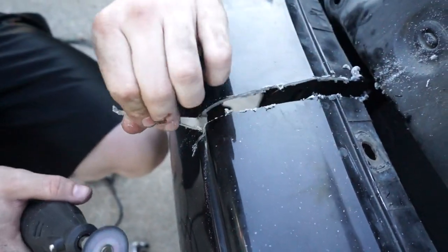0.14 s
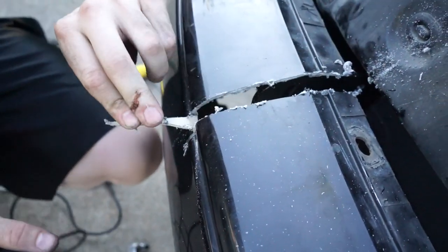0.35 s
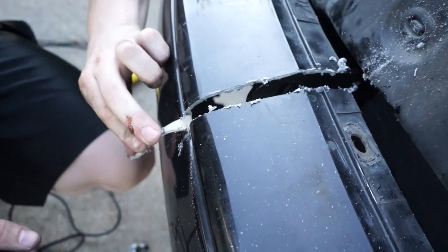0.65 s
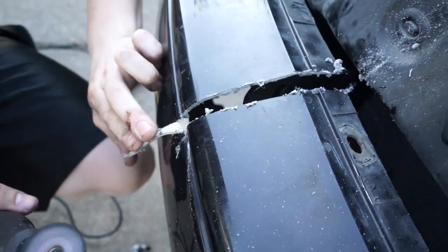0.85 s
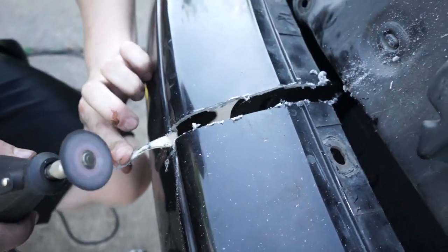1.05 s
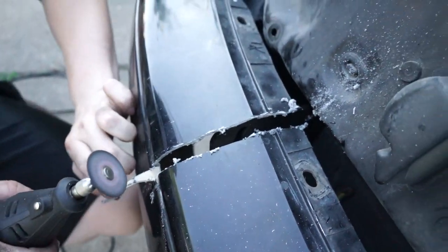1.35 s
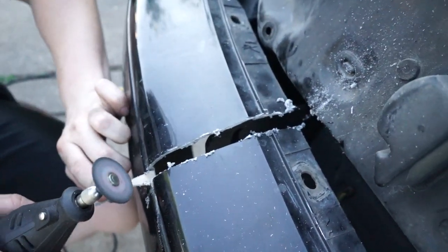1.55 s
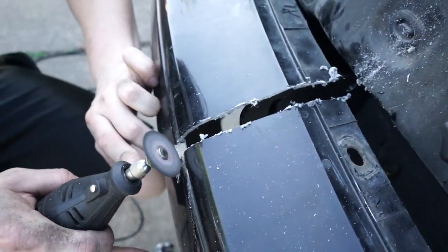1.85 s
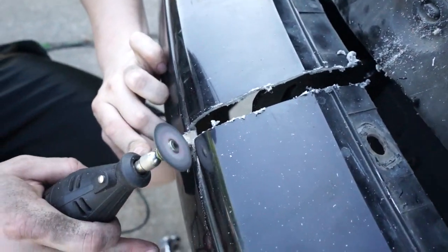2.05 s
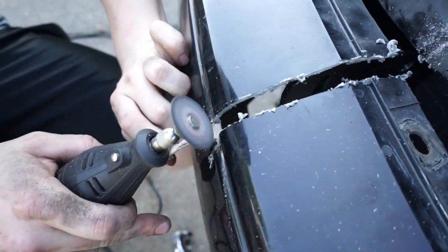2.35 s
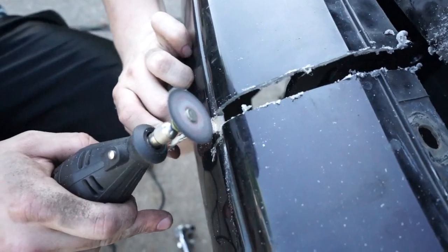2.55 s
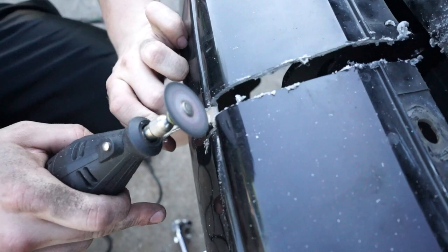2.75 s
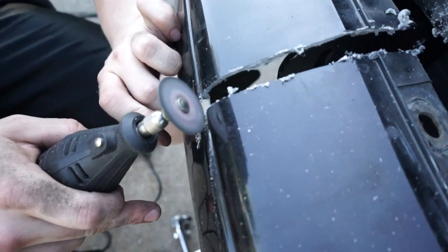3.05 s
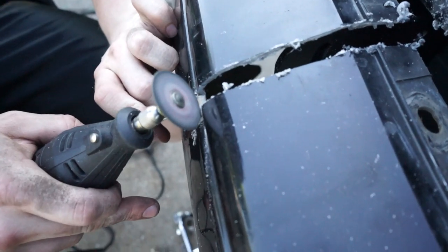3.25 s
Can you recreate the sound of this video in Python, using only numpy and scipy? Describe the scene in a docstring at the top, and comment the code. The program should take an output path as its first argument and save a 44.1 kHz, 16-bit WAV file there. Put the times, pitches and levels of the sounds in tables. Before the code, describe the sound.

A handheld rotary tool whines at a steady high pitch with airy hiss, close up.

```python
"""Rotary tool beside a plastic bumper

A hand-held rotary tool runs at full speed close to a stereo microphone, beside a car's plastic bumper.
It is first held aside, then swung to the panel, where the disc touches and the motor slows a little.
The shaft sings a stack of sine tones, and the commutator whines at the sixteenth multiple.
Fan and brushes hiss as shaped noise; late on, the hand knocks softly on the panel in short low pulses."""
import sys
import numpy as np
from scipy import signal
from scipy.fft import rfft, irfft, next_fast_len
from scipy.io import wavfile
from scipy.ndimage import uniform_filter1d, map_coordinates

SR = 44100
rng = np.random.default_rng(int(sys.argv[2]) if len(sys.argv) > 2 else 0)


def output_pcm(signal):
    """Save a mono or channel-first signal as 16-bit PCM at the path in sys.argv[1].

    Samples are clipped to [-1, 1] before scaling.
    """
    pcm = np.clip(np.atleast_2d(signal).T, -1, 1) * 32767
    wavfile.write(sys.argv[1], SR, np.round(pcm).astype(np.int16))


N = 149940  # samples
TIME = np.arange(N) / SR  # seconds
PORT = np.array([[.5], [-.5]])  # shares a left-right difference between the two microphone ports


def amp(db):
    """Turn decibels into a plain multiplier."""
    return np.exp(np.asarray(db) * np.log(10) / 20)


def curves(rows):
    """One value per sample for each column after the time."""
    seconds, *columns = np.transpose(rows)
    return [np.interp(TIME, seconds, column) for column in columns]


def wobble(rate):
    """Two smooth random curves, one a port, with `rate` random knots a second."""
    knots = rng.standard_normal((2, 128))
    step = np.arange(0, N + 64, 64)  # the smooth curve is worked out every 64 samples
    position = step * rate / SR
    smooth = [map_coordinates(k, [position], mode="wrap") for k in knots]
    return np.array([np.interp(np.arange(N), step, curve) for curve in smooth])


def filtered(x, response):
    """Shape the spectrum of x with a complex response that depends on frequency."""
    size = next_fast_len(N + SR // 2)
    spectrum = rfft(x, size) * response(np.fft.rfftfreq(size, 1 / SR))
    return irfft(spectrum, size)[..., :N]


# How the tool swings from the side to the panel.
# Each row: time in seconds, position (0 held aside, 1 at the panel), change of the hiss level in dB.
SWING_PATH = [(0, 0.25, -2), (.85, 0.092, -0.5), (1.2, 0.41, -3.5), (1.6, 0.68, -3.5), (2.3, 0.8, 0.5),
              (3.4, 0.7, -0.5)]


def posed(aside, panel):
    """A value that moves with the tool's swing, from held aside to at the panel."""
    seconds, position, _ = np.transpose(SWING_PATH)
    return np.interp(TIME, seconds, aside + (panel - aside) * np.clip(position, 0, 1))


# How fast the shaft spins, before its small jitter.
# Each row: time in seconds, shaft turns per second in Hz.
SHAFT_SPEED = [(0, 502.05), (1.1, 501.9), (1.99, 501.4), (2.13, 499.45), (2.22, 499.45), (2.45, 500.1),
               (3.05, 500.7), (3.4, 499.9)]
JITTER_HZ, JITTER_RATE = 0.16, 18  # unsteady shaft speed: size in Hz, knots per second


def shaft():
    """Shaft angle in radians: the speed and its jitter, added up over time."""
    speed = curves(SHAFT_SPEED)[0] + JITTER_HZ * wobble(JITTER_RATE)[0]
    return 2 * np.pi * np.cumsum(speed) / SR


LEAD_ASIDE_S, LEAD_PANEL_S = 9e-5, 5e-5  # the left port hears the tool this many seconds first


def shaft_lead():
    """The left port's head start, in radians of shaft turn."""
    return posed(LEAD_ASIDE_S, LEAD_PANEL_S) * 2 * np.pi * curves(SHAFT_SPEED)[0]


def tone(phase, level_db, pan_db, lead):
    """A stereo sine of given rms level, left-right difference and left lead in radians."""
    start = rng.uniform(0, 2 * np.pi)
    return np.sqrt(2) * amp(level_db + PORT * pan_db) * np.sin(phase + PORT * lead + start)


# The commutator whine, fading at each port as the tool moves among reflections.
# Each row: time in seconds, left level in dB, right level in dB, left lead in rad; levels before trembling.
WHINE_LEVELS = [(0, -26, -29, 2.6), (.12, -19.5, -17.5, 2.13), (.2, -21, -28, 1.5),
                (.26, -24.5, -26.5, 5.3), (.44, -22.5, -22, 4), (.56, -17.5, -33, 7.7),
                (.74, -19.5, -22.5, 5.8), (.84, -24, -22, 10.7), (.94, -17, -23.5, 12.8),
                (1.01, -22, -25, 13.3), (1.07, -20.5, -15, 19.5), (1.13, -14, -17.5, 17.3),
                (1.25, -18, -19, 16.4), (1.38, -22, -20.5, 17.16), (1.51, -15, -12, 18.2),
                (1.78, -20, -12.5, 17.02), (1.97, -12.5, -21, 15.1), (2.17, -16, -19, 15.75),
                (2.27, -15, -15.5, 15.7), (2.39, -15, -24, 14.2), (2.47, -17.5, -18.5, 15.9),
                (2.72, -15, -19, 15), (2.99, -17.5, -15, 14.6), (3.21, -21.5, -15, 15),
                (3.4, -16, -17.5, 16)]
BARS = 16  # commutator bars passing per shaft turn
TREMBLE_DB, TREMBLE_RATE = .5, 35  # fast level tremble at each port: size in dB, knots per second


def whine(angle):
    """The commutator bars pass sixteen times a turn, loud and shifting between the ports."""
    left_db, right_db, lead = curves(WHINE_LEVELS)
    level_db = (left_db + right_db) / 2 + TREMBLE_DB * wobble(TREMBLE_RATE)
    return tone(BARS * angle, level_db, left_db - right_db, lead)


# The first five shaft tones as the tool turns, before flutter and trembling.
# Each row: time in seconds, then the levels of the 1st, 2nd, 3rd, 4th and 5th tone in dB.
LOW_LEVELS = [(0, -37, -31.7, -31, -42.5, -32), (0.33, -37, -33.5, -32, -40.5, -34.5),
              (0.62, -31, -34, -35, -41, -40), (0.85, -33, -38.3, -27.5, -44.5, -35),
              (1.04, -33.5, -37.5, -36, -27, -36), (1.22, -31.5, -38.5, -41.5, -37, -42.5),
              (1.45, -27.5, -43.5, -45, -37, -38), (1.8, -29.5, -42, -44.5, -40, -45.5),
              (2.15, -27, -40, -38, -31, -60), (2.7, -27.5, -36, -37.5, -30.5, -40.5),
              (3.4, -27.5, -36.5, -35.5, -27.5, -40.5)]
# The same five tones between the ports, one row a tone.
# Each row: left minus right in dB aside, the same at the panel, left lead in rad aside, the same at the panel.
LOW_PORTS = [(-1.5, 4.6, 0.44, 0.32), (5, 11.5, 0.35, -2), (5, .1, 0.02, -0.96), (10, 1.2, -0.88, 1.1),
             (10.5, 2.3, 0.44, -1.5)]
FLUTTER_DB, FLUTTER_RATE = .3, 8.66  # slow flutter: size in dB times the tone number, knots per second


def low_tones(angle):
    """Unbalance of disc and rotor sings at the shaft multiples; higher tones flutter more in the hand."""
    total = 0
    for k, (level_db, ports) in enumerate(zip(curves(LOW_LEVELS), LOW_PORTS), 1):
        pan_aside, pan_panel, lead_aside, lead_panel = ports
        flutter_db = FLUTTER_DB * k * wobble(FLUTTER_RATE)[0]
        tremble_db = TREMBLE_DB * wobble(TREMBLE_RATE)
        pan_db, lead = posed(pan_aside, pan_panel), posed(lead_aside, lead_panel)
        total = total + tone(k * angle, level_db + flutter_db + tremble_db, pan_db, lead)
    return total


# Shaft tones that swell on their own as the tool turns.
# Each row: multiple of the shaft speed, left minus right in dB.
MIDDLE_PORTS = [(6, -4), (7, 0), (11, 5.5), (15, 8.5), (17, -11.5)]
# Their levels before trembling.
# Each row: time in seconds, then the level in dB of each tone above, in the same order.
MIDDLE_LEVELS = [(0, -41, -36.5, -39, -38, -30), (.5, -52, -38, -40, -31, -39.5),
                 (.9, -46, -36.5, -34, -33.5, -34.5), (1.6, -55, -42, -54.5, -39.5, -35.5),
                 (1.9, -36.5, -45, -40.5, -44, -37.5), (2.4, -41.5, -41.5, -36, -27.5, -40.5),
                 (2.85, -39.5, -42, -34.5, -38, -37), (3.4, -41, -35, -44, -36, -37)]


def middle_tones(angle):
    """Shaft tones of the middle range, trembling at each port twice as deeply as the low ones."""
    lead = shaft_lead()
    total = 0
    for (k, pan_db), level_db in zip(MIDDLE_PORTS, curves(MIDDLE_LEVELS)):
        tremble_db = 2 * TREMBLE_DB * wobble(TREMBLE_RATE)
        total = total + tone(k * angle, level_db + tremble_db, pan_db, k * lead)
    return total


# Weaker shaft tones, before fading.
# Each row: multiple of the shaft speed, level in dB aside, level in dB at the panel, left minus right in dB.
UPPER_TONES = [(8, -53.5, -47, 4), (14, -38.5, -41, 1.5), (18, -32.5, -40.5, -2.5), (23, -52, -49, 0),
               (31, -41, -54, 11)]
# Side tones from the mains ripple in the motor, before fading.
# Each row: shaft multiple, ripple multiple, level in dB aside, level in dB at the panel.
RIPPLE_TONES = [(2, 1, -52, -78), (2, 2, -49, -75), (4, -1, -43, -57), (4, 1, -40.5, -54),
                (5, -1, -33, -81), (5, 1, -39, -52), (6, -1, -56, -47)]
RIPPLE_HZ = 120
BEARING, BEARING_ASIDE_DB, BEARING_PANEL_DB = 4.945, -34.5, -55  # balls passing per shaft turn; levels
FADE_DB, FADE_RATE, DRIFT_RAD = 2.2, 4.5, .45  # slow fading at each port, knots per second, phase drift
# The remaining shaft multiples, falling in level by one even step each: first level, and the step.
REST_ASIDE_DB, REST_PANEL_DB, REST_STEP_DB = -45.5, -50.5, -.55
TAKEN = [BARS] + [row[0] for row in UPPER_TONES] + [row[0] for row in MIDDLE_PORTS]
REST = [k for k in range(8, 31) if k not in TAKEN]


def weak_tones(angle):
    """Upper and remaining shaft tones, ripple side tones and the bearing, each fading on its own."""
    ripple = 2 * np.pi * RIPPLE_HZ * TIME
    lead = shaft_lead()
    # each: shaft multiple, ripple multiple, dB aside, dB at the panel, left minus right dB
    rows = [(k, 0, aside, panel, pan) for k, aside, panel, pan in UPPER_TONES]
    rows += [(k, m, aside, panel, 2.5) for k, m, aside, panel in RIPPLE_TONES]
    for j, k in enumerate(REST):
        step_db = REST_STEP_DB * j
        rows.append((k, 0, REST_ASIDE_DB + step_db, REST_PANEL_DB + step_db, 2))
    rows.append((BEARING, 0, BEARING_ASIDE_DB, BEARING_PANEL_DB, 4))
    total = 0
    for k, m, aside, panel, pan_db in rows:
        phase = k * angle + m * ripple + DRIFT_RAD * wobble(FADE_RATE)
        level_db = posed(aside, panel) + FADE_DB * wobble(FADE_RATE)
        total = total + tone(phase, level_db, pan_db, k * lead)
    return total


# Spectrum of the fan and brush hiss, before the level change of the swing.
# Each row: frequency in Hz, level in dB per Hz aside, level in dB per Hz at the panel.
HISS_SPECTRUM = [(40, -100, -100), (100, -86, -89), (285, -86, -90.5), (710, -79.5, -87),
                 (1160, -72, -80.5), (1833, -63, -68.5), (1947, -59.5, -60.5), (2530, -63.5, -72.5),
                 (3350, -65.5, -74.5), (4480, -65, -74), (7800, -68.5, -70.5), (8470, -64, -73.5),
                 (10400, -71.5, -104), (10600, -67.5, -70), (14400, -77.5, -86.5)]
ALIKE_BASS, ALIKE_TREBLE, ALIKE_TURN_HZ = .93, .5, 3000  # left-right likeness of the hiss
PATCHY_DB = 1.6  # uneven loudness over time and frequency
HISS_PAN_DB, GATE = 0.5, 0.3  # each port's shift, left up and right down; pulsing depth, added by choice


def rush(column, lead_s):
    """Patchy stereo noise with the hiss spectrum of one position."""
    grains = signal.stft(rng.standard_normal((2, N)), nperseg=512)[2]
    field = rng.standard_normal(grains.shape[1:])
    field = uniform_filter1d(uniform_filter1d(field, size=5, axis=0), size=8, axis=1)
    patches = amp(PATCHY_DB * field / field.std())
    shared, opposed = signal.istft(grains * patches, nperseg=512)[1][:, :N]
    table = np.transpose(HISS_SPECTRUM)

    def turn(hz):
        """Mixing angle that makes the two ports as alike as wanted."""
        alike = ALIKE_TREBLE + (ALIKE_BASS - ALIKE_TREBLE) / (1 + (hz / ALIKE_TURN_HZ) ** 2)
        return np.arccos(np.clip(alike, 0, 1)) / 2

    def colour(hz):
        """Hiss spectrum, with the left port ahead in time."""
        level_db = np.interp(np.log(hz + 1), np.log(table[0]), table[column])
        return np.sqrt(SR / 2) * amp(level_db) * np.exp(2j * np.pi * hz * lead_s * PORT)

    same = filtered(shared, lambda hz: colour(hz) * np.cos(turn(hz)))
    opposite = filtered(opposed, lambda hz: 2 * PORT * colour(hz) * np.sin(turn(hz)))
    return same + opposite


def hiss(angle):
    """Fan and brush noise with a slight pulsing at the shaft rate added by choice, duller at the panel."""
    swing = posed(0, np.pi / 2)
    aside = np.cos(swing) * rush(column=1, lead_s=LEAD_ASIDE_S)
    panel = np.sin(swing) * rush(column=2, lead_s=LEAD_PANEL_S)
    pulsing = 1 + GATE * np.sin(angle)
    level_db = curves(SWING_PATH)[1] + 2 * PORT * HISS_PAN_DB
    return (aside + panel) * pulsing * amp(level_db)


# Soft low knocks of the hand on the panel.
# Each row: time of the peak in seconds, peak level in dB.
HAND_KNOCKS = [(2.905, -41), (2.941, -48), (3.074, -44)]
KNOCK_HZ, KNOCK_S = 157, 0.0021  # pitch, and width of the bell-shaped swell in seconds


def knocks():
    """Each knock is a single dull push: a low cosine inside a short bell-shaped swell."""
    total = 0
    for seconds, peak_db in HAND_KNOCKS:
        since = TIME - seconds
        swell = np.exp(-.5 * (since / KNOCK_S) ** 2)
        total = total + amp(peak_db) * swell * np.cos(2 * np.pi * KNOCK_HZ * since)
    return total


def scene():
    """The shaft tones and the hiss follow one shaft angle; the knocks are added on top."""
    angle = shaft()
    tones = whine(angle) + low_tones(angle) + middle_tones(angle) + weak_tones(angle)
    return tones + hiss(angle) + knocks()


TOP_HZ = 15760  # band limit


def record(dry):
    """The microphone's sound keeps nothing above its band limit."""
    return filtered(dry, lambda hz: hz < TOP_HZ)


dry = scene()
out = record(dry)
output_pcm(out)
```